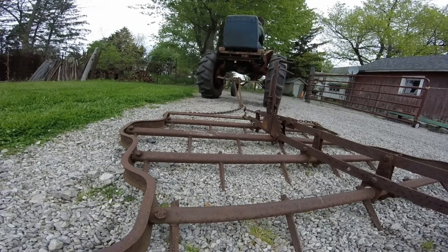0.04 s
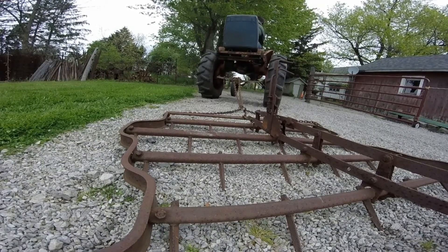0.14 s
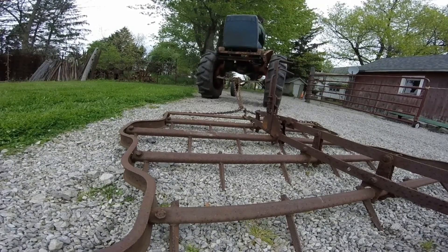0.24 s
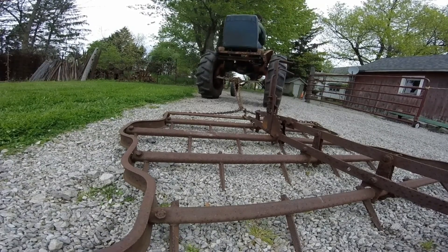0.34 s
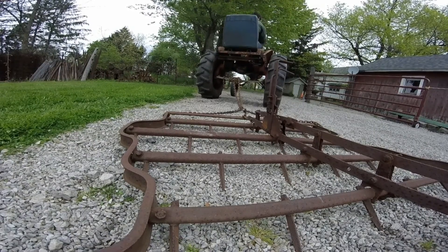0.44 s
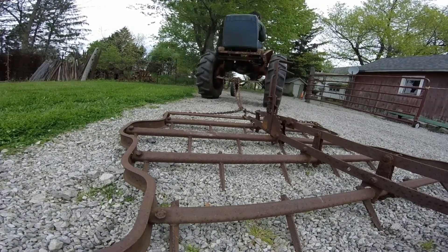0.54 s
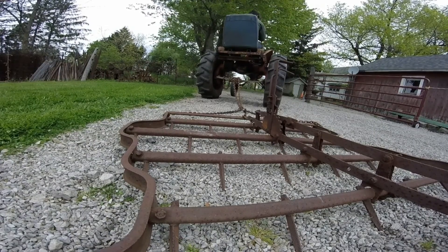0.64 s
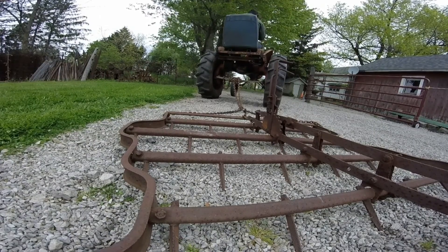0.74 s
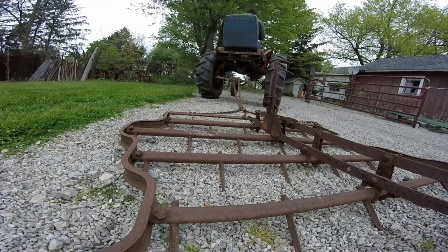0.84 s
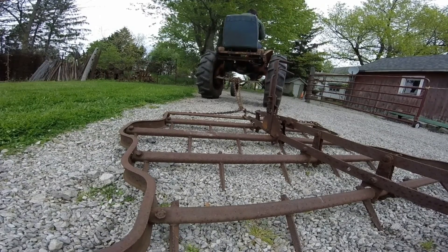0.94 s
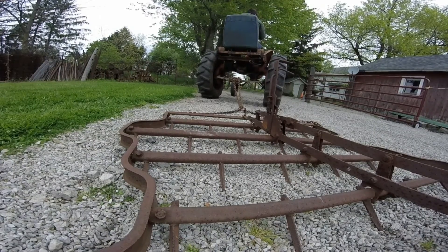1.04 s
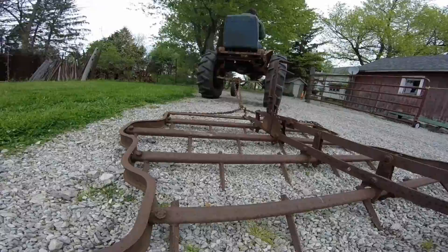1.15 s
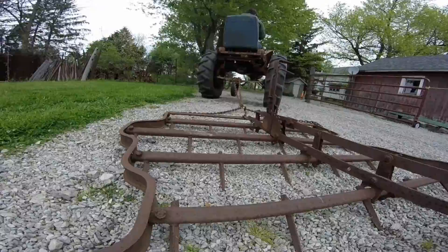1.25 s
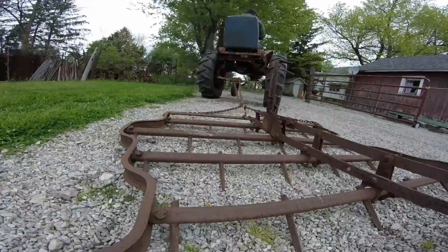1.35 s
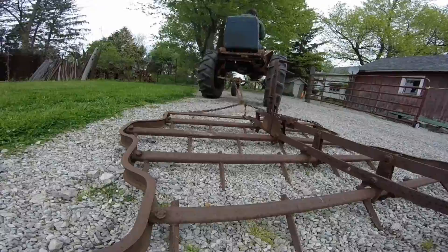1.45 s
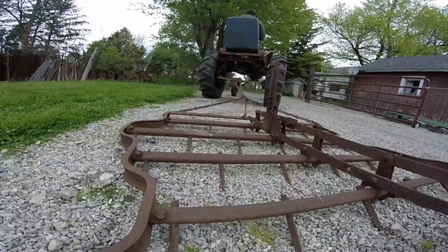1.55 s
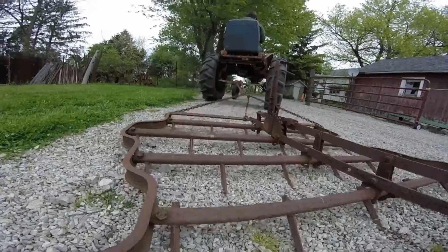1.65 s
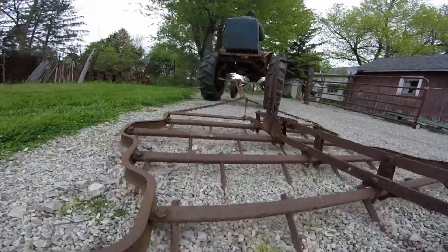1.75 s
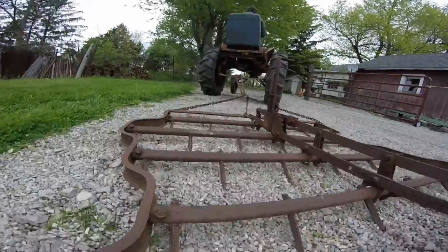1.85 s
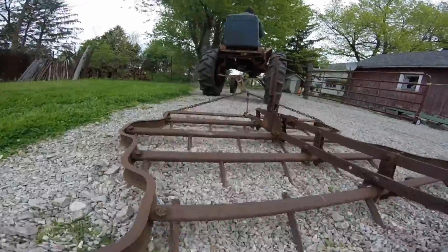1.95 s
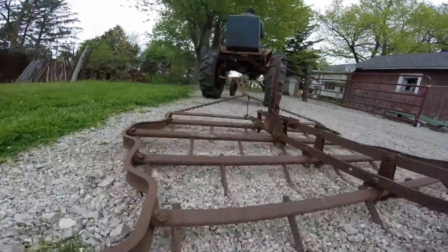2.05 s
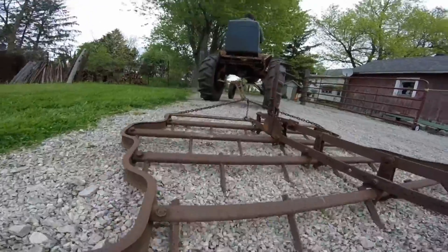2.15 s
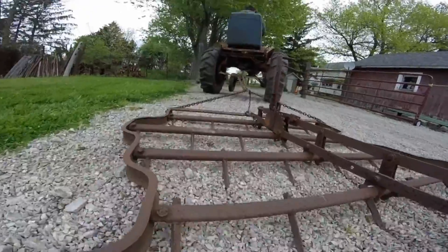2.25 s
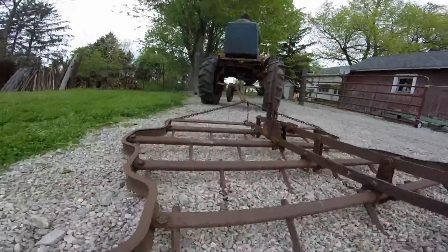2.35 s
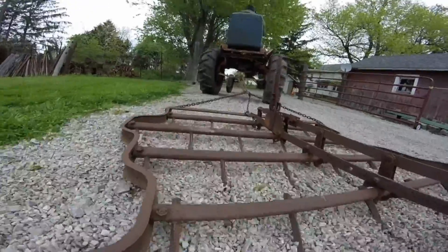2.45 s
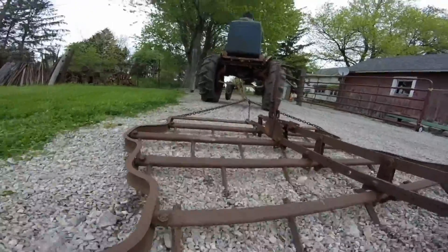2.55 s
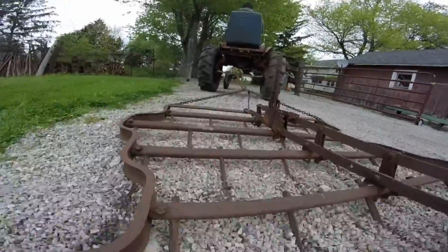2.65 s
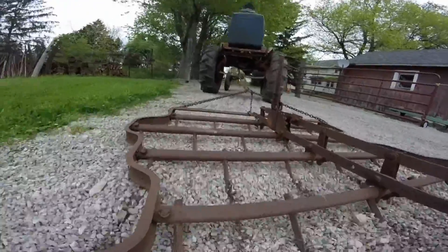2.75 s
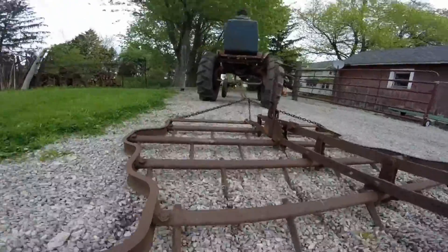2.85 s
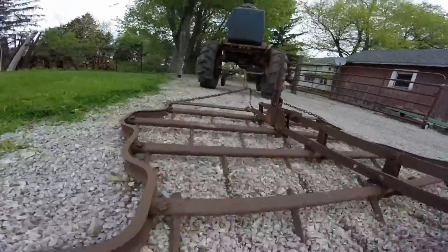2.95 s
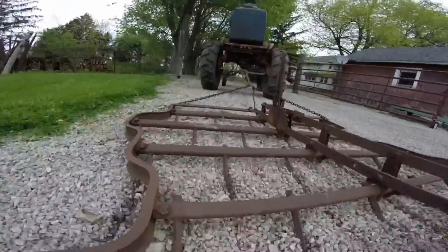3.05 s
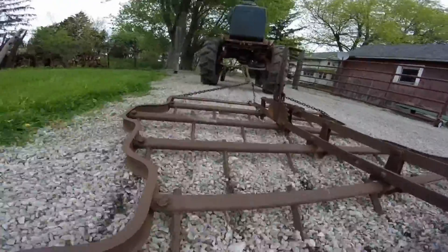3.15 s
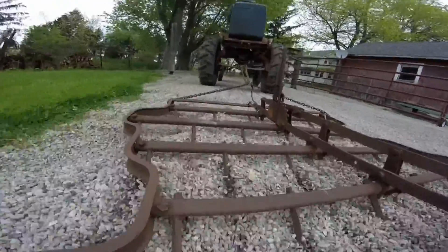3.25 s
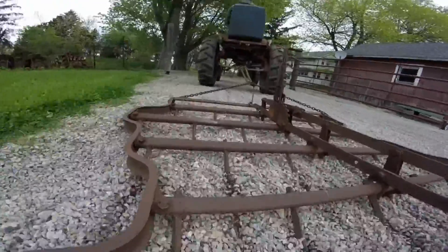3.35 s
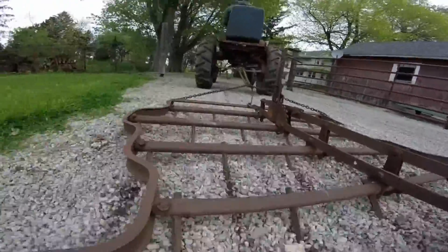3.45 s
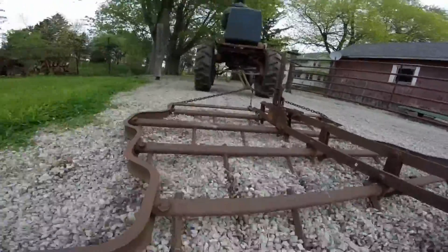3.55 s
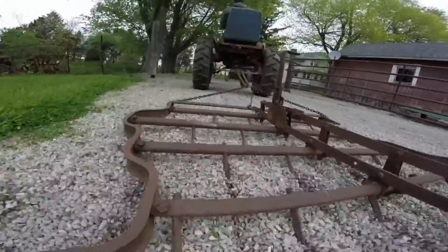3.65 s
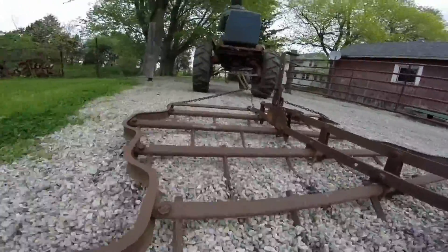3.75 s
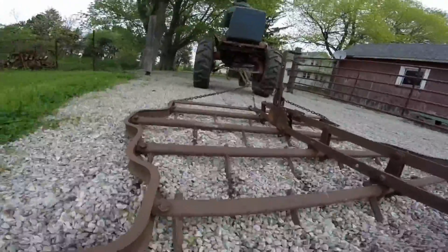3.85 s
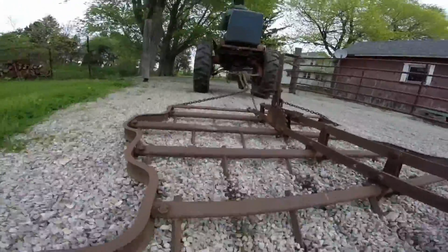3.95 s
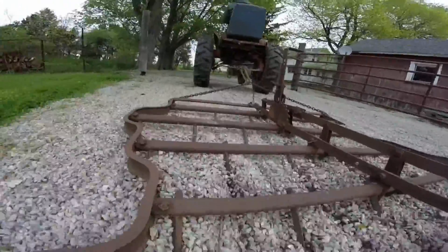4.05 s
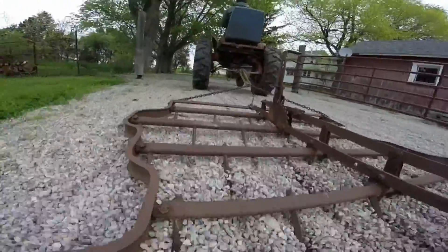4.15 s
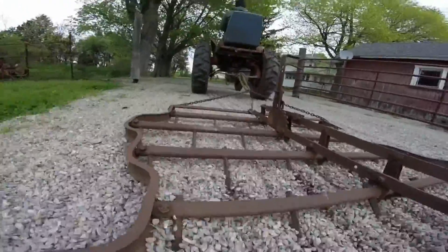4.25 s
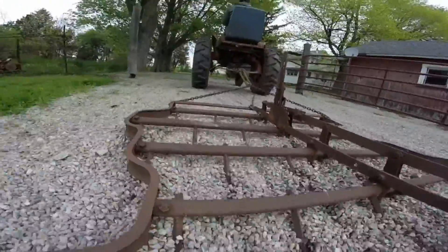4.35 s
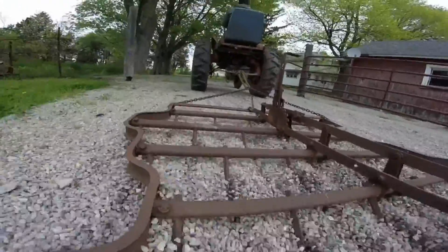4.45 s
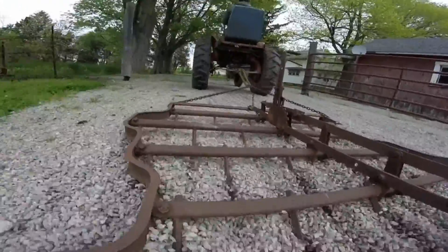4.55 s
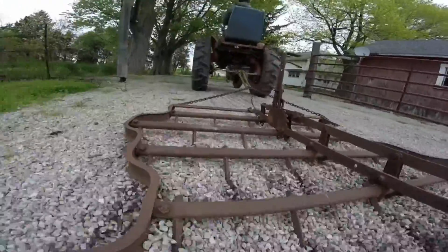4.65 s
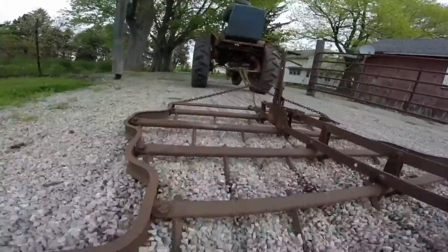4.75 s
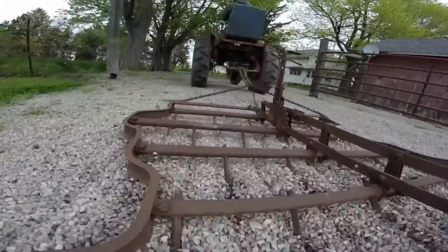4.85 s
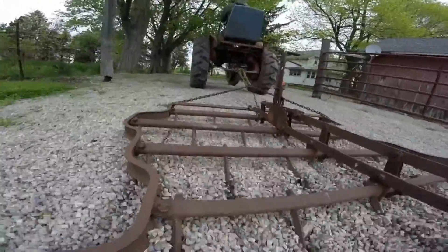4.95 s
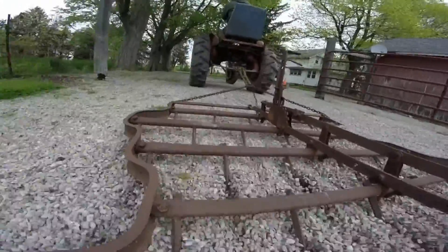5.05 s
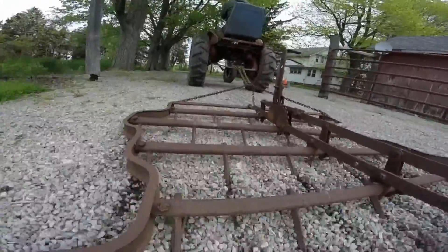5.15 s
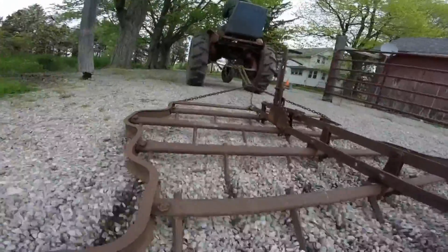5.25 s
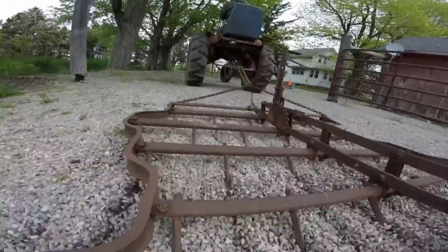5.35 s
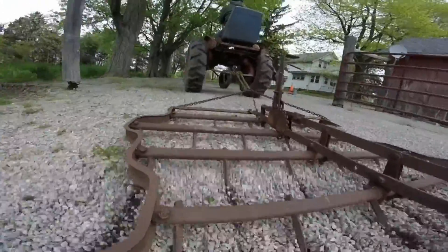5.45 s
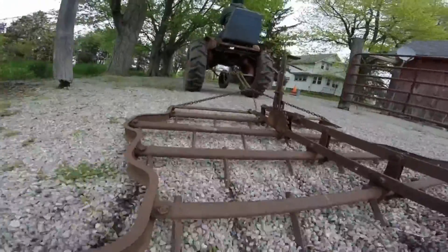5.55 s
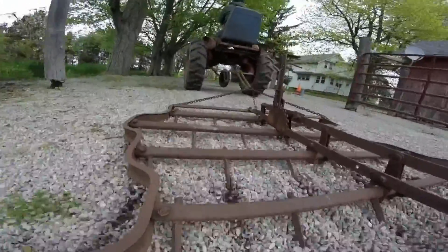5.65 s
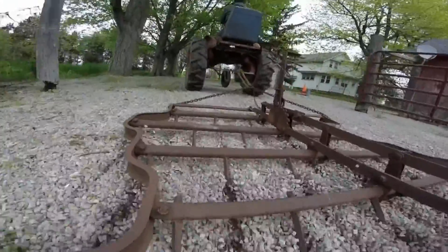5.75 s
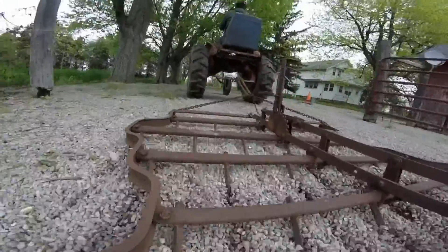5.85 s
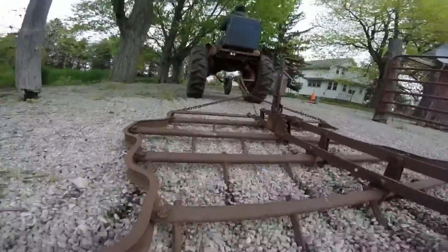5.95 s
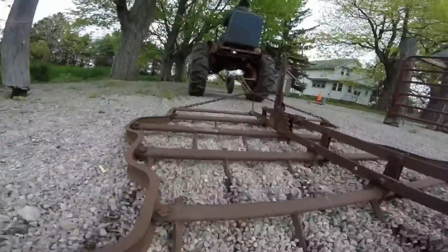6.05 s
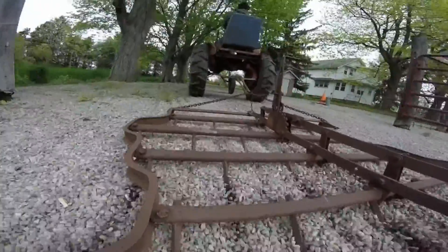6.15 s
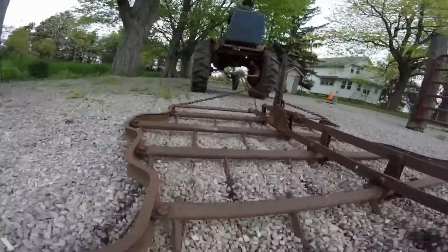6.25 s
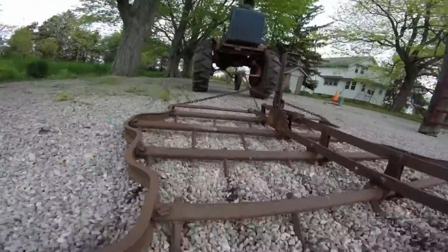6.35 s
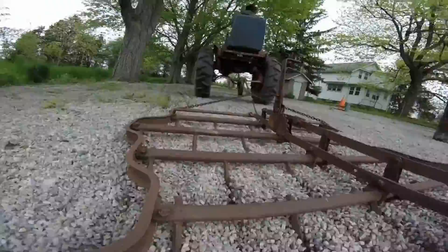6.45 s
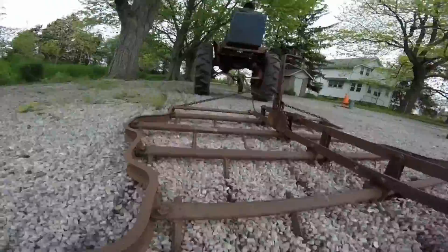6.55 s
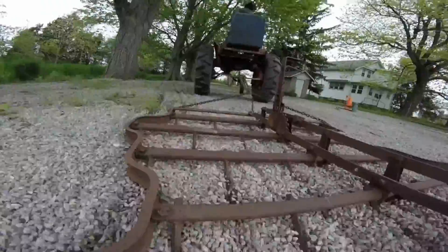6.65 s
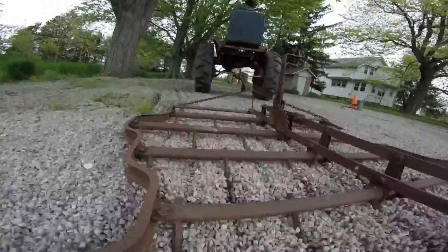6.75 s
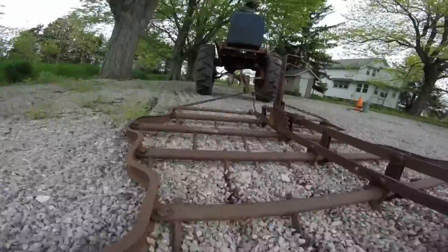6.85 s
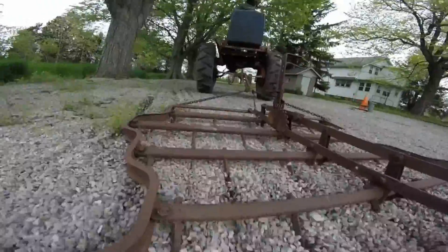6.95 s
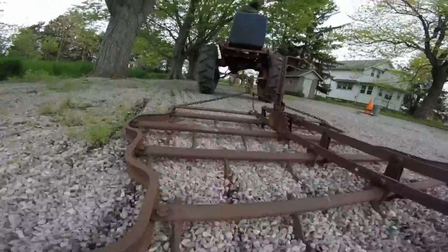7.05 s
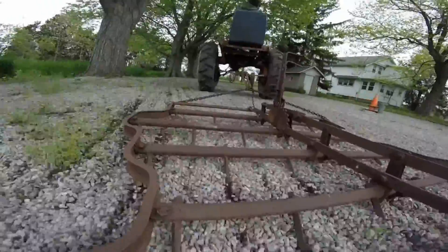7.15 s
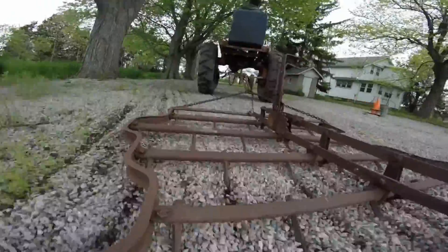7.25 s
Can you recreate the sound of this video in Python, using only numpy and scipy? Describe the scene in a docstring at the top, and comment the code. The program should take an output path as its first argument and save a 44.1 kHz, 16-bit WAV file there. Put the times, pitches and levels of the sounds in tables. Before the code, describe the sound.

Outdoors on a gravel drive, a tractor idles quietly, muffled and uneven, with a tiny hitch squeak at the start and one dry tick. Then the steel drag lurches forward: a sudden loud rattle of stones on bars and teeth over heavy frame rumble, with knocks, jolts, clacks and brief singing scrapes. The microphone rides on the drag in a closed case, so the sound is close and boxy, with dulled treble.

```python
"""Tractor and gravel drag

A tractor idles, then pulls a steel spike-tooth drag through gravel; the microphone sits in a closed case on the drag.
Engine: firing pulses, flow noise, tones and valve clatter, muffled by the case.
Drag: random stone contacts ring frame, bars, teeth and case; the level swells, drops suddenly and recovers.
Accents: a hitch squeak, a dry tick, tooth knocks, frame jolts, clacks of flung stones, singing scrapes."""
import sys
import numpy as np
from scipy import signal
from scipy.io import wavfile
from scipy.ndimage import uniform_filter1d, minimum_filter1d

SR = 44100
rng = np.random.default_rng(int(sys.argv[2]) if len(sys.argv) > 2 else 0)


def bounce(signal):
    """Save signal as a 16-bit WAV file at the path given by the first command-line argument."""
    frames = np.transpose(np.atleast_2d(signal))
    limited = np.clip(frames, -1, 1)
    pcm = np.round(limited * 32767).astype(np.int16)
    wavfile.write(sys.argv[1], SR, pcm)


N = 321930

# Resonances; widths are per filter pass
# frame bending: f/Hz, width/Hz, level/dB
FRAME_MODES = [(20, 15, -13), (33, 24, -12), (61, 47, -10.5), (82, 33, -5.5), (101.7, 61.3, 0.5),
               (167.6, 73.5, -2), (243.2, 55.5, -6.5), (312.2, 76, -11.5), (451.5, 100, -16)]
# bars and case: f/Hz, width/Hz, level/dB
BAR_MODES = [(604, 490, -16), (952, 128, -5), (1049, 138, -2.5), (1174, 110, -8), (1308, 156, -4.5),
             (1440, 130, -6), (1533, 117, 0), (1621, 87, -4.5), (1889, 380, -11.5), (2163, 152, -12),
             (2492, 304, -12.5)]
# teeth: f/Hz, width/Hz, level/dB
TOOTH_MODES = [(2890, 131, -5), (2995, 147, -5.5), (3227, 250, -10.5), (3564, 283, -18.5)]
# crack of stone on stone: f/Hz, width/Hz, level/dB
STONE_MODES = [(3360, 960, 8.5), (4470, 820, 3), (6240, 990, -1), (7360, 1350, -13.5), (8940, 1300, -16.5),
               (11500, 2000, -34)]


def from_db(db):
    """Decibels to amplitude gain."""
    return 10 ** (np.asarray(db) / 20)


def unit_rms(x):
    """Scale to unit rms."""
    return x / np.sqrt(np.mean(x ** 2) + 1e-20)


def in_time(rows, before=None):
    """Columns of a curve table, interpolated to every sample."""
    t_s, *columns = np.transpose(rows)
    return [np.interp(np.arange(N) / SR, t_s, c, left=before) for c in columns]


def drift(rate_hz):
    """Low-passed noise of unit spread, made at every 40th sample and interpolated."""
    r = np.exp(-80 * np.pi * rate_hz / SR)
    noise = rng.standard_normal(N // 40 + 2002)
    slow = signal.lfilter([1], [1, -2 * r, r * r], noise)[2000:]   # drop the filter's start-up
    return np.interp(np.arange(N) / 40, np.arange(len(slow)), unit_rms(slow - slow.mean()))


def resonate(x, hz, width_hz):
    """A resonance passed twice: soft onset, steep skirts, gain 1 on top."""
    r = np.exp(-np.pi * width_hz / SR)
    g = (1 - r * r) / 2
    stage = [g, 0, -g, 1, -2 * r * np.cos(2 * np.pi * hz / SR), r * r]
    return signal.sosfilt([stage, stage], x + 1e-18)


def strike(modes, at, sizes, spread_db):
    """Each blow drives every mode with its own strength and sign; sizes may be a function of mode pitch."""
    luck = rng.standard_normal((len(at), len(modes), 2))
    out = np.zeros(N)
    for k, (hz, width_hz, level_db) in enumerate(modes):
        size = sizes(hz) if callable(sizes) else sizes
        gain = from_db(level_db + spread_db * luck[:, k, 0])
        strength = size * gain * np.sign(luck[:, k, 1])
        out += resonate(np.bincount(at, strength, N), hz, width_hz)
    return out


def grains(modes, per_s, tail_db, clumps_db, patchy_db, spread_db):
    """Random contacts, mostly small, a few large, ring modes that swell and fade independently; rms 1."""
    at = np.flatnonzero(rng.random(N) < per_s / SR)
    size_db = clumps_db[at] + tail_db * np.minimum(rng.exponential(1, len(at)), 4)

    def patchy_sizes(hz):
        return from_db(size_db + patchy_db * drift(13.3)[at])

    return unit_rms(strike(modes, at, patchy_sizes, spread_db))


def samples(events):
    """Event times as sample indices."""
    return (np.array(events)[:, 0] * SR).astype(int)


def contacts(events, count, spread_s):
    """Split each event into a first contact and random later ones: delays/s and sample indices."""
    late_s = rng.exponential(spread_s, (len(events), count)) * (np.arange(count) > 0)
    late_s = late_s.ravel()
    at = np.repeat(samples(events), count) + (late_s * SR).astype(int)
    return late_s, np.minimum(at, N - 1)


def engine():
    """Uneven firing pulses and turbulence ring the exhaust; firing harmonics add tones, valves clatter."""
    # idle levels: t/s, exhaust/dB, clatter/dB
    idle = [(0.0, -26, -44), (0.136, -30, -48.5), (0.68, -32.5, -48), (1.19, -27, -48), (1.37, -31, -48.5),
            (1.5, -28, -49)]
    # exhaust and hitch resonances: f/Hz, width/Hz, level/dB
    exhaust_modes = [(38, 19, -13.5), (95.6, 40, -12), (137.5, 50, -4), (168.2, 36, -1.5),
                     (203.4, 30.3, -1), (267.6, 39, -14), (324.6, 41, -18.5), (467, 38, -27.5),
                     (640, 350, -42)]
    # valve clatter resonances: f/Hz, width/Hz, level/dB
    clatter_modes = [(1073, 330, -9), (1300, 200, -11), (1580, 320, -1), (2110, 580, -11),
                     (2450, 340, -12.5), (2980, 200, -12), (3394, 280, -7), (3910, 510, -16.5),
                     (4750, 580, -25.5), (5990, 1200, -22.5), (7300, 1000, -31.5), (8130, 2800, -31)]
    # tones: multiple of firing rate, mean amplitude/dB
    orders = [(1, -41), (4, -41), (6, -39), (9, -36.5), (14, -54)]
    mean_firing_hz = 22.86

    exhaust_db, clatter_db = in_time(idle)
    firings = np.cumsum(mean_firing_hz * (1 + 0.01147 * drift(3.04))) / SR
    fired = np.flatnonzero(np.diff(np.floor(firings)))
    pulses = unit_rms(strike(exhaust_modes, fired, np.ones(len(fired)), spread_db=1.0))
    flow = grains(exhaust_modes, per_s=1500, tail_db=2.5, clumps_db=0.99 * drift(22),
                  patchy_db=0.3, spread_db=1.0)
    exhaust = unit_rms(0.37 * pulses + flow)
    tones = sum(from_db(db + 3.8 * drift(2.5)) * np.sin(2 * np.pi * k * firings) for k, db in orders)
    # valves repeat every other firing
    throb = 1 + 0.093 * np.cos(np.pi * firings) + 0.15 * np.cos(4 * np.pi * firings)
    clatter = throb * grains(clatter_modes, per_s=4000, tail_db=0.5, clumps_db=1.0 * drift(30),
                             patchy_db=0.5, spread_db=1.2)
    return from_db(exhaust_db) * exhaust + tones + from_db(clatter_db) * clatter


def drag():
    """Stones stream against the teeth in clumps: frame rumble, rattle of bars, ring of teeth, treble grit."""
    # gravel load as bar rattle: t/s, level/dB
    pull = [(1.42, -60), (1.58, -46.5), (1.618, -29), (1.634, -16), (1.7, -18), (1.95, -19), (2.3, -19),
            (2.9, -20), (3.4, -18), (3.75, -17.5), (4.2, -22), (4.35, -18), (5.4, -19), (6.0, -19.5),
            (6.9, -19.5), (7.3, -19)]
    # faint rattle as the frame settles: t/s, level/dB
    settling = [(0, -39), (.04, -47), (.06, -44), (.09, -55), (.14, -90)]
    # treble passed by the case: f/Hz, width/Hz, level/dB
    case_modes = [(4276, 590, 3.5), (4680, 300, 1), (5270, 920, -6.5), (6300, 890, -4), (7080, 790, -9.5),
                  (8000, 1130, -12), (9080, 820, -16), (10980, 1400, -17), (13500, 2500, -63)]
    full_load_db = -19.5
    # level at full load; share of the load's swing in dB
    rumble_full_db, rumble_follows = -17.5, 0.74   # from cruise_s on
    ring_full_db, ring_follows = -26.5, 0.93
    grit_full_db, grit_follows = -46, 0.81
    rumble_lead_s = 0.028   # the frame takes the strain before the teeth move
    grit_lag_s = 0.018   # loose stones take a moment to fly
    rumble_grows_db_per_s, cruise_s = 0.69, 5.3   # the tractor gathers speed until cruise_s

    rattle_db = in_time(pull, before=-120)[0] + dips()
    swing_db = rattle_db - full_load_db
    n = np.arange(N)
    early_swing_db = np.interp(n + rumble_lead_s * SR, n, swing_db)
    rumble_db = rumble_full_db + rumble_follows * early_swing_db
    rumble_db += rumble_grows_db_per_s * np.minimum(n / SR - cruise_s, 0)
    ring_db = ring_full_db + ring_follows * swing_db
    keep = np.exp(-1 / (grit_lag_s * SR))
    late_swing_db = signal.lfilter([1 - keep], [1, -keep], swing_db, zi=[swing_db[0]])[0]
    grit_db = grit_full_db + grit_follows * late_swing_db

    clumps = np.tanh(0.53 * drift(52))   # heaps of gravel load all parts together
    heaps = 0.94 * drift(3.2)   # slower swells between one heap and the next
    rumble = grains(FRAME_MODES, per_s=900, tail_db=2.0, clumps_db=1.8 * clumps + 0.84 * heaps,
                    patchy_db=1.26, spread_db=1.5)
    rattle = grains(BAR_MODES, per_s=1200, tail_db=2.0, clumps_db=2.24 * clumps + 0.94 * heaps,
                    patchy_db=1.7, spread_db=2.5)
    ring = grains(TOOTH_MODES, per_s=1000, tail_db=2.5, clumps_db=2.15 * clumps + 1.2 * heaps,
                  patchy_db=2.0, spread_db=2.5)
    grit = grains(case_modes, per_s=2500, tail_db=3.0, clumps_db=4.4 * clumps + 0.52 * heaps,
                  patchy_db=2.0, spread_db=4.0)
    pebbles = grains(STONE_MODES, per_s=42, tail_db=6.5, clumps_db=2.2 * clumps,
                     patchy_db=-2.0, spread_db=3.0)
    grit += 0.24 * pebbles

    settle = from_db(in_time(settling)[0])
    rattle_gain = from_db(rattle_db) + settle
    ring_gain = from_db(ring_db) + scrapes() + 0.43 * settle
    return from_db(rumble_db) * rumble + rattle_gain * rattle + ring_gain * ring + from_db(grit_db) * grit


def squeak():
    """A link of the hitch squeaks once: an impulse through one narrow resonance."""
    # t/s, level/dB, f/Hz, width/Hz
    t_s, level_db, hz, width_hz = (.053, -47, 3930, 130)
    impulse = np.bincount([int(t_s * SR)], [from_db(level_db) * SR / width_hz], N)
    return resonate(impulse, hz, width_hz)


def tick():
    """One dry tick: a sudden step that dies away within about two milliseconds."""
    # t/s, peak/dB
    t_s, peak_db = (1.19627, -14)
    impulse = np.bincount([int(t_s * SR)], [from_db(peak_db)], N)
    return signal.lfilter([1], [1, -.96], impulse)


def knocks():
    """A tooth catching on a big stone judders in four blows; modes near its pitch ring most."""
    # t/s, relative level/dB, favoured f/Hz
    catches = [(1.63, 3, 1130), (1.635, 0.5, 1560), (1.656, -3, 2950), (1.68, -4.5, 1550),
               (1.726, -4, 1500), (1.747, 5, 1580), (1.77, 0, 1580), (1.842, -7, 1040), (2.266, -4.5, 1510),
               (2.295, -2, 2880), (2.447, -2.5, 1460), (2.626, -2.5, 2960), (2.668, 2, 1030),
               (2.702, -2, 1550), (2.752, -3, 1540), (2.78, -0.5, 2900), (2.821, -2, 2800),
               (2.845, -1.5, 1490), (2.86, -2, 2460), (3.105, 0, 1500), (3.239, -5.5, 1480),
               (3.334, -4, 1520), (3.421, -2, 1310), (3.487, -4, 1020), (3.634, -3, 1480),
               (3.751, -3, 1530), (3.813, -4, 1300), (3.916, -19, 1490), (4.011, -1, 1080),
               (4.107, -4, 2480), (4.291, -3, 1540), (4.335, -1, 1590), (4.565, 2, 1540),
               (5.216, 0.5, 1040), (5.272, -4, 1330), (5.553, -0.5, 1380), (5.575, -3, 1460),
               (6.026, -6, 2900), (6.177, -5, 1330), (6.431, -3.5, 1520), (6.521, -7, 1560),
               (6.904, -3, 1440), (7.127, -1.5, 2860), (7.266, 3.5, 2960)]
    late_s, at = contacts(catches, count=4, spread_s=.005)
    _, level_db, pitch_hz = np.repeat(catches, 4, axis=0).T

    def sizes(hz):
        octaves_off = np.minimum(np.abs(np.log2(hz / pitch_hz)), .6)
        return from_db(level_db + 31.0 - 190 * late_s - 18.3 * octaves_off)

    return strike(BAR_MODES + TOOTH_MODES, at, sizes, spread_db=0.5)


def jolts():
    """Heavy pushes bend the whole frame: single blows on its low modes."""
    # t/s, relative level/dB
    pushes = [(1.644, -1), (1.671, -5), (1.795, -3.5), (2.02, -4), (2.136, -7), (2.46, -8), (2.753, -5.5),
              (2.98, -6.5), (3.17, -4), (3.745, -5), (3.654, -9), (5.433, -4), (5.492, -6), (6.209, -4.5),
              (6.0, -11), (6.09, -8), (6.332, -14), (6.565, -8), (7.002, -7)]
    return strike(FRAME_MODES, samples(pushes), from_db(np.array(pushes)[:, 1] + 40.0), spread_db=3.0)


def clacks():
    """Flung stones clack close by: a few milliseconds of treble crackle and a short, dry body."""
    # t/s, relative level/dB, body relative to crack/dB, body f/Hz
    hits = [(1.6569, -20, -3, 1850), (1.7998, -21.5, 6, 2180), (1.8402, -28, 13, 1800),
            (2.1974, -17.5, 10, 1700), (2.7774, -17, 10, 2420), (2.8106, -24, 3, 2160),
            (2.8608, -16.5, 8, 2400), (2.8889, -21.5, 7.5, 2170), (3.0101, -20.5, 8, 2430),
            (3.0184, -24, 11, 2160), (3.1901, -21.5, 3, 1920), (3.2479, -25, -4, 1710),
            (3.4292, -29, 16, 1900), (3.4458, -22.5, 3, 2490), (3.486, -14.5, 7, 2410),
            (3.6657, -23, 2, 1750), (3.7658, -13.5, 5.5, 2170), (3.8123, -28, 16, 2160),
            (3.9137, -17.5, 7.5, 1730), (3.9432, -20.5, 1, 2200), (4.0738, -16.5, 6, 2310),
            (4.1081, -13.5, 6, 2470), (4.2912, -29, 6, 1910), (4.3105, -26, 6, 2000),
            (4.335, -26, 13, 1990), (4.3767, -24, 15, 2210), (4.4388, -25, 8, 1870), (4.6385, -25, 8, 1900),
            (4.7525, -30, 0, 1900), (4.9435, -27, 0, 1900), (4.9955, -25.5, 5, 1970),
            (5.3288, -27, 4, 1920), (5.4482, -29, 7, 1900), (5.5529, -27, -4, 1790), (5.656, -29, 6, 1730),
            (5.8542, -23, 5, 2440), (5.933, -27, -2, 1800), (5.9979, -25, -1, 1700),
            (6.1, -26.5, 13.5, 1710), (6.2383, -19, 10.5, 2050), (6.2817, -30, 3, 1920),
            (6.3518, -28, 0, 1900)]
    late_s, at = contacts(hits, count=8, spread_s=.0028)
    _, level_db, body_db, pitch_hz = np.repeat(hits, 8, axis=0).T
    fade_db = level_db - 2000 * np.abs(late_s - .002)   # crunch peaks 2 ms after first contact
    body_modes = [(hz, 450, 0) for hz in (1500, 1900, 2300, 2700)]   # sizes of stone

    def body_sizes(hz):
        return from_db(fade_db + body_db + 30.0 - 25 * np.abs(np.log2(hz / pitch_hz)))

    body = strike(body_modes, at, body_sizes, spread_db=2.5)
    crack = strike(STONE_MODES, at, from_db(fade_db + 14.5), spread_db=1.5)
    return crack + body


def dips():
    """Level change/dB: the level swells, drops suddenly and recovers, mostly around heavy jolts."""
    # t/s, swell before/dB, dip after/dB (negative reverses either), recovery time constant/s
    dip_table = [(1.8, 1.5, 15.5, 0.042), (1.871, 4, 3, 0.055), (2.09, 1, 6, .03), (2.21, 3, 3.5, .04),
                 (2.31, 5, -1, .03), (2.47, 3, 3, 0.034), (2.87, -1, 5, 0.087), (3.025, 5.5, 5.5, 0.11),
                 (3.2, 2.5, 4, 0.055), (3.5, 1, 4.5, 0.076), (3.94, -0.5, 3.5, 0.044), (4.12, 4, -2, 0.057),
                 (4.21, 2.5, 3.5, .04), (4.44, 2, 2, 0.063), (5.5, 0.5, 6, 0.049), (5.585, -2.5, 5, 0.059),
                 (6.1, -0.5, 3, .05), (6.249, 1, 9.5, 0.062), (6.62, -0.5, 6, .05), (6.93, 2, 4, 0.12)]
    swell_s = 0.051   # growth time constant before each drop
    t = np.arange(N // 40 + 1) * 40 / SR
    change_db = np.zeros(len(t))
    for drop_s, swell_db, dip_db, recovery_s in dip_table:
        before = t < drop_s
        fade = np.exp(-np.abs(t - drop_s) / np.where(before, swell_s, recovery_s))
        change_db += np.where(before, swell_db, -dip_db) * fade
    return np.interp(np.arange(N) / SR, t, uniform_filter1d(change_db, size=9))


def scrapes():
    """A tooth grinds along one stone and sings: bell-shaped gain for the teeth's ring."""
    # t/s, peak gain/dB, length/s
    scrape_table = [(1.948, -25, 0.022), (2.062, -32, 0.026), (2.165, -21.5, 0.041), (2.293, -23, 0.028),
                    (2.636, -27, .03), (2.996, -23, 0.024), (3.718, -29, 0.027), (4.188, -36, 0.026),
                    (4.397, -27, .03), (6.035, -26, 0.024), (7.152, -24, 0.049), (7.267, -28, 0.03)]
    t = np.arange(N // 40 + 1) * 40 / SR
    gain = sum(from_db(db) * np.exp(-(2 * (t - mid_s) / length_s) ** 2)
               for mid_s, db, length_s in scrape_table)
    return np.interp(np.arange(N) / SR, t, gain)


def scene():
    """Everything sums at one microphone."""
    return (engine() + drag() + squeak() + tick() + knocks() + jolts() + clacks())[None]


def record(dry):
    """A look-ahead limiter holds peaks, releasing at a constant dB rate; a low-pass cuts the top."""
    limit, attack_s, release_db_per_s = 0.88, 0.0036, 150
    cutoff_hz = 16800   # stopband edge
    ramp_db = release_db_per_s * np.arange(N) / SR
    over_db = np.maximum(20 * np.log10(np.abs(dry[0]) / limit + 1e-9), 0)
    held_db = np.maximum(np.maximum.accumulate(over_db + ramp_db) - ramp_db, 0)
    reach = int(attack_s * SR) * 2 + 1   # samples, centred: looks both ways
    gain_db = uniform_filter1d(minimum_filter1d(-held_db, size=reach), size=reach)
    low_pass = signal.cheby2(12, 70, cutoff_hz, fs=SR, output="sos")
    return signal.sosfilt(low_pass, dry * from_db(gain_db))


dry = scene()
out = record(dry)
bounce(out)
```